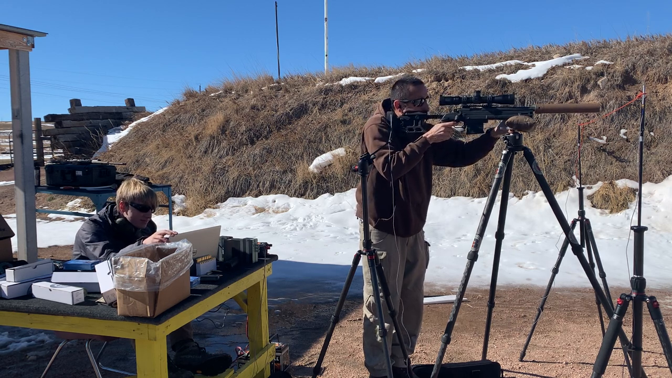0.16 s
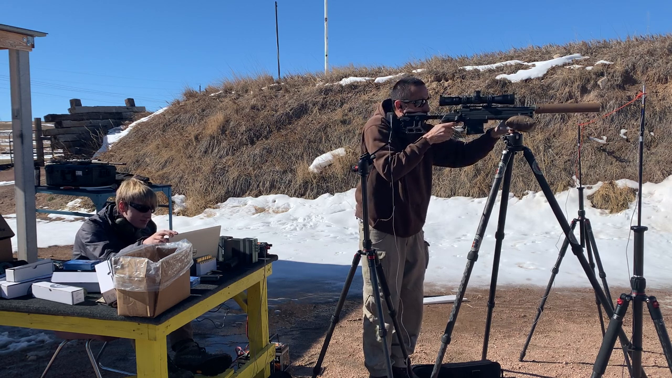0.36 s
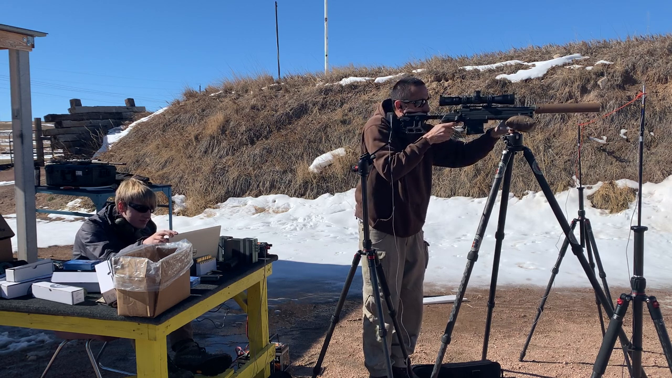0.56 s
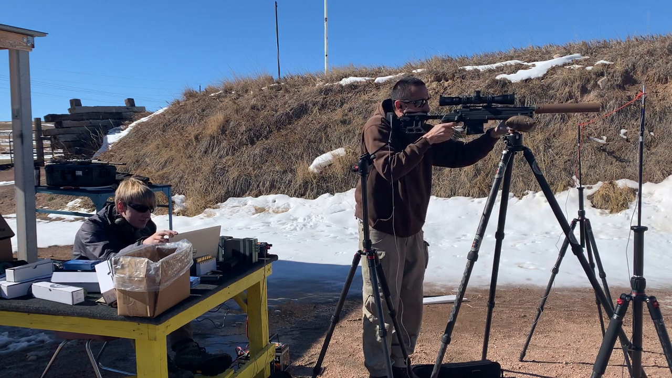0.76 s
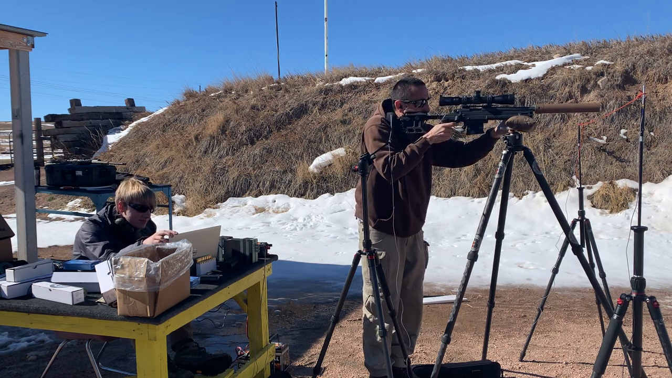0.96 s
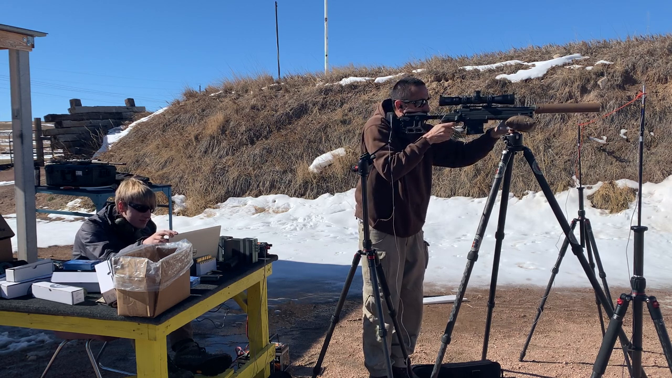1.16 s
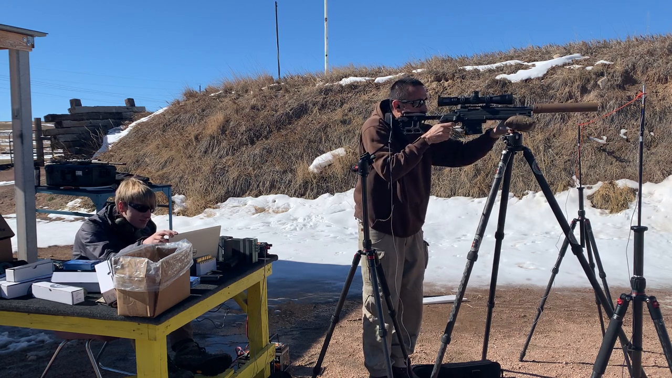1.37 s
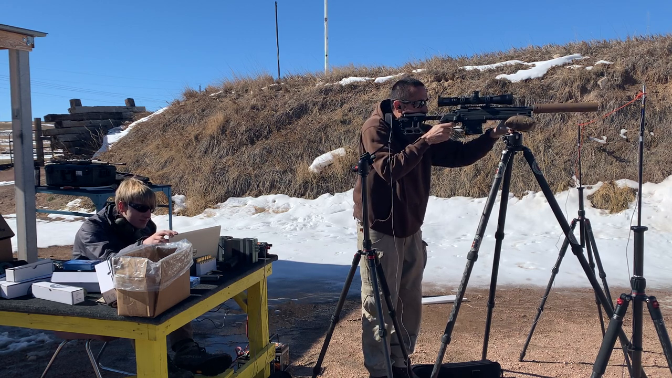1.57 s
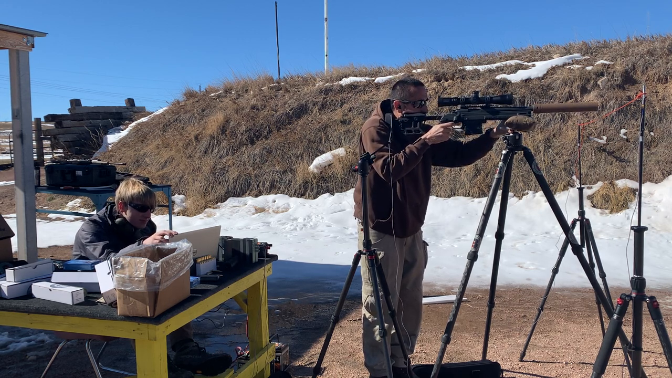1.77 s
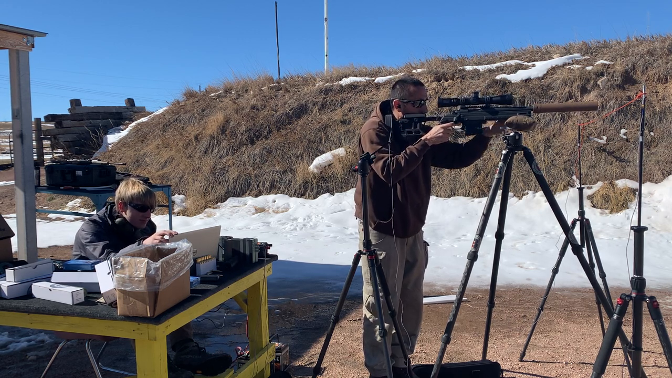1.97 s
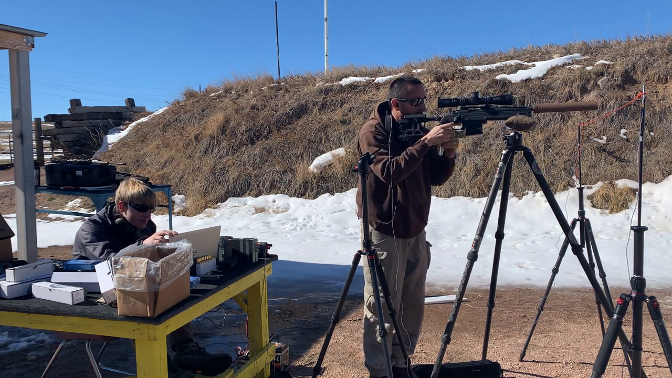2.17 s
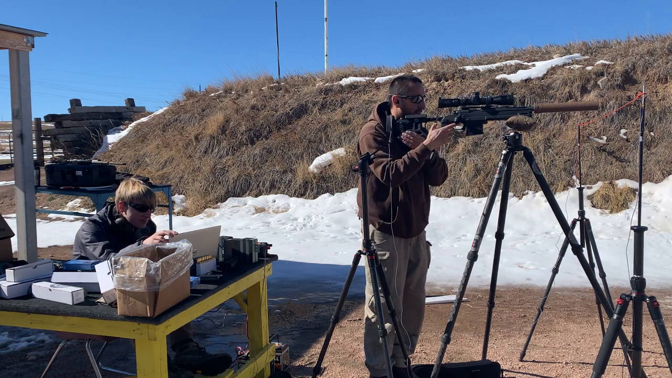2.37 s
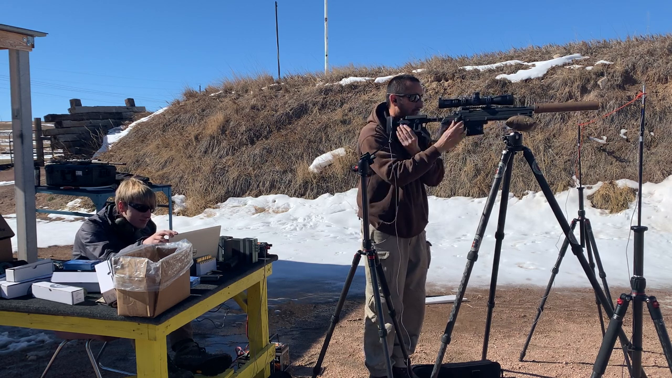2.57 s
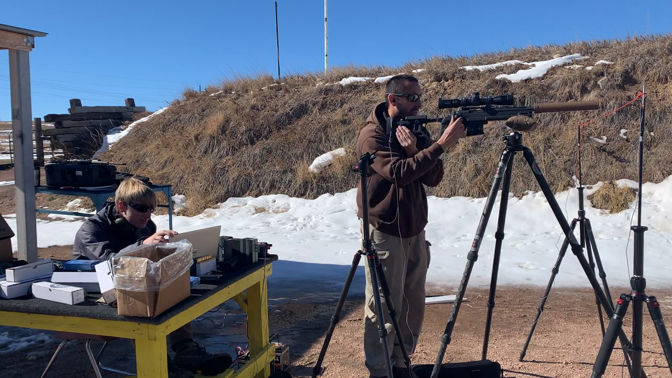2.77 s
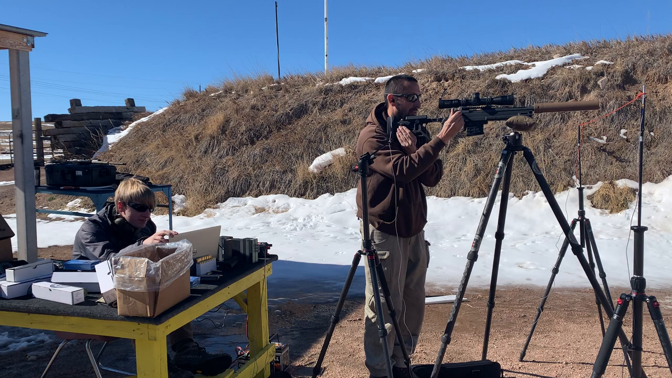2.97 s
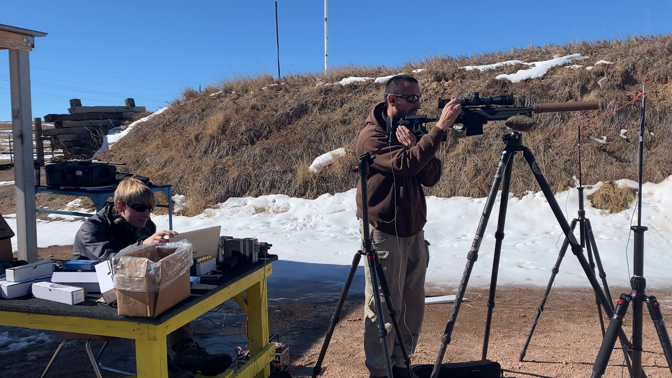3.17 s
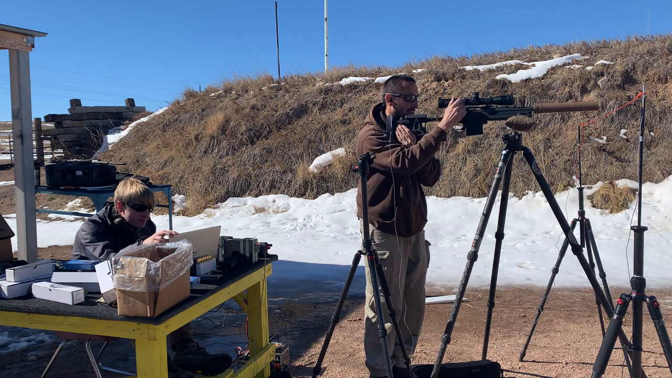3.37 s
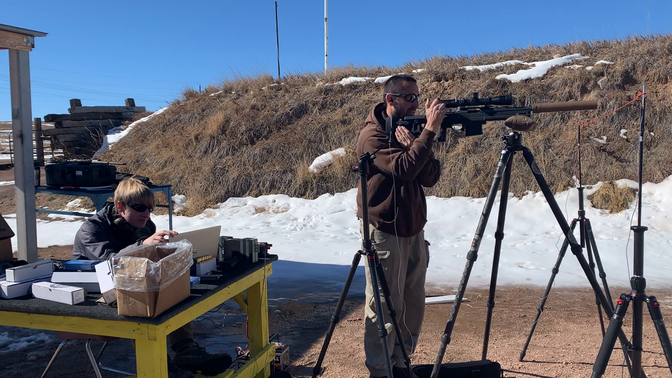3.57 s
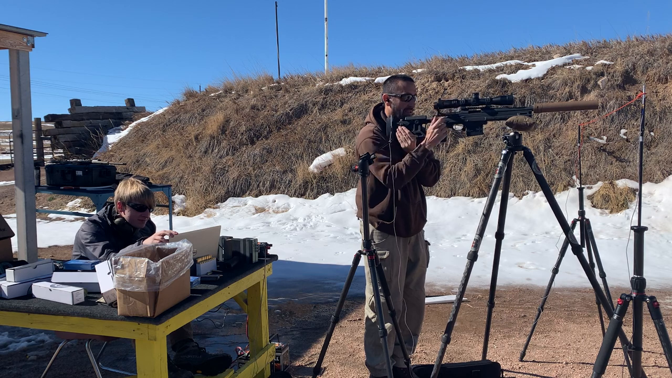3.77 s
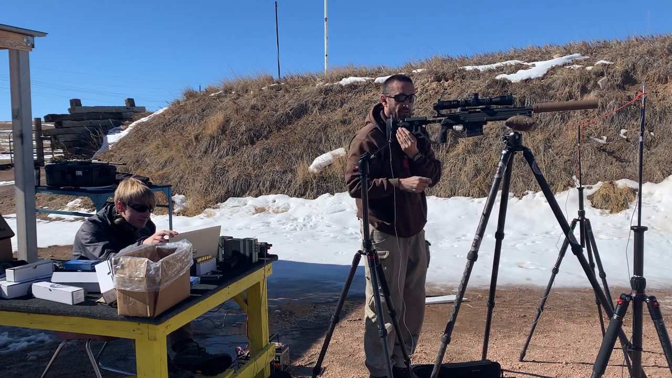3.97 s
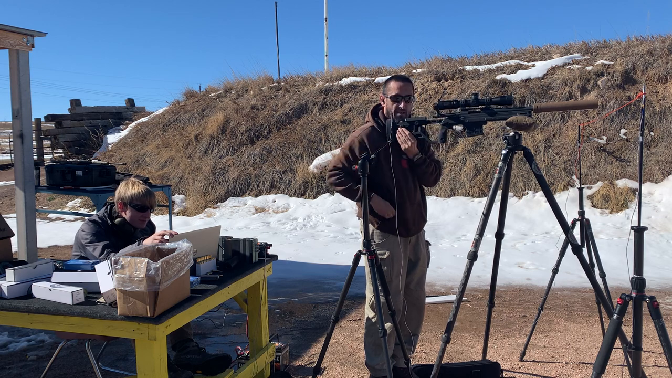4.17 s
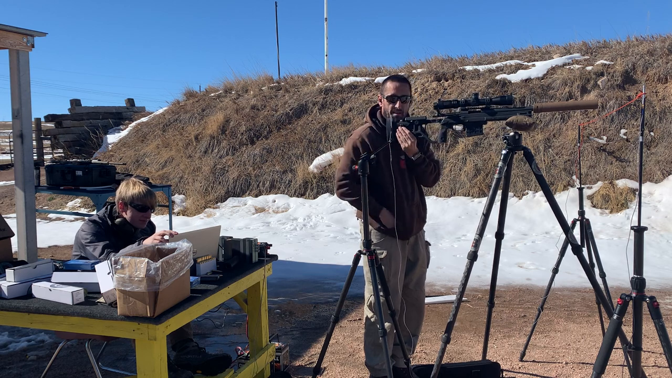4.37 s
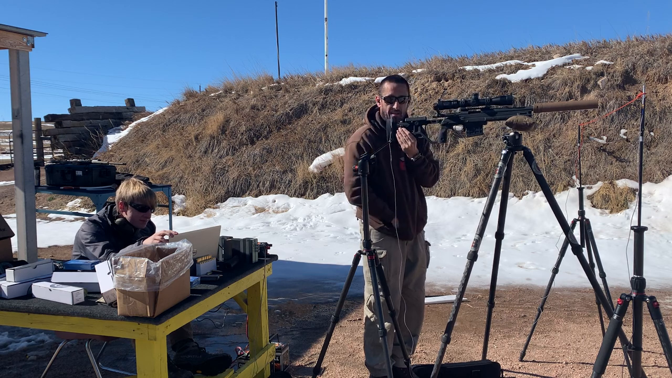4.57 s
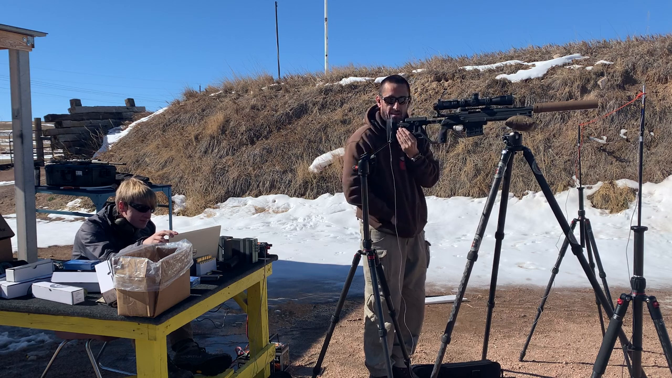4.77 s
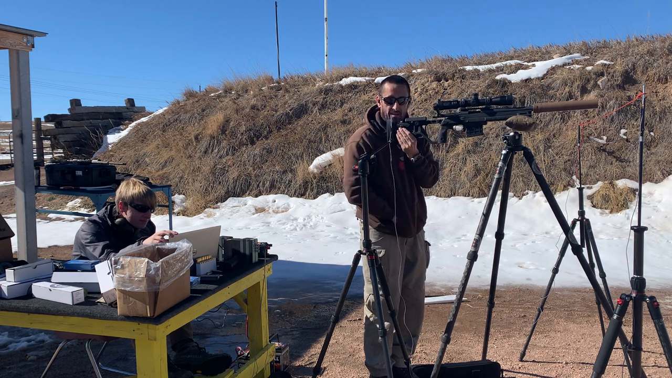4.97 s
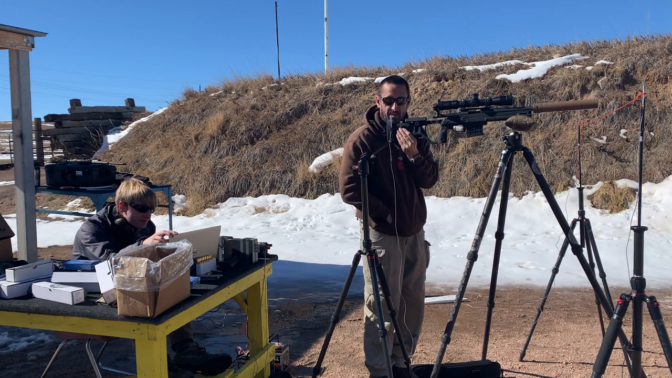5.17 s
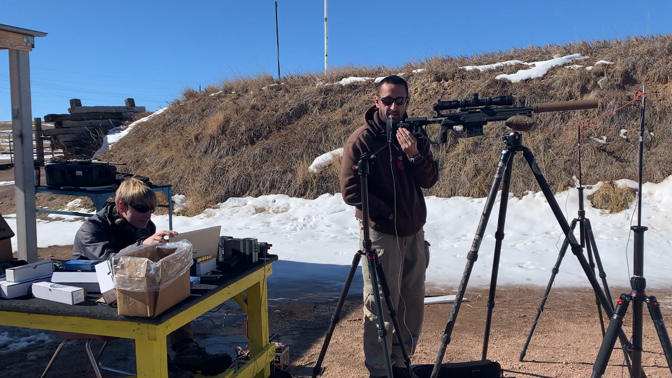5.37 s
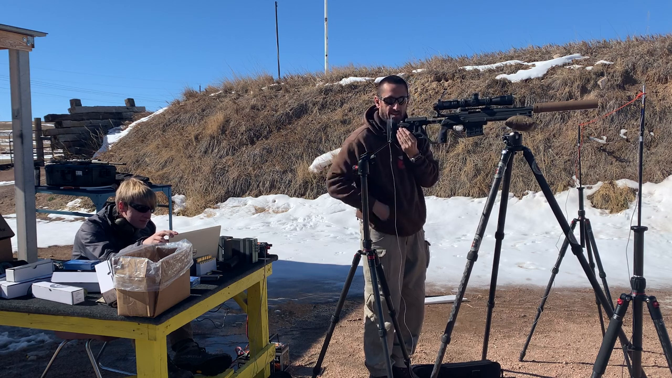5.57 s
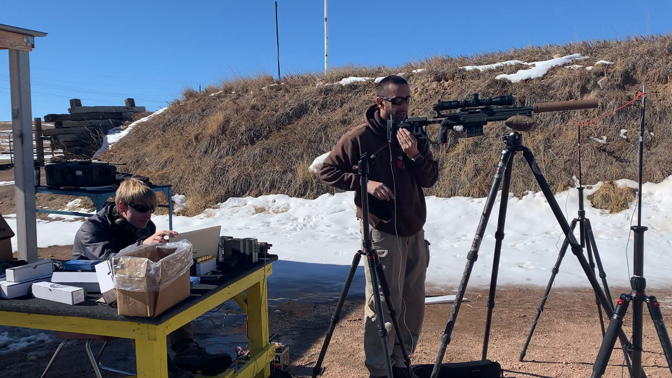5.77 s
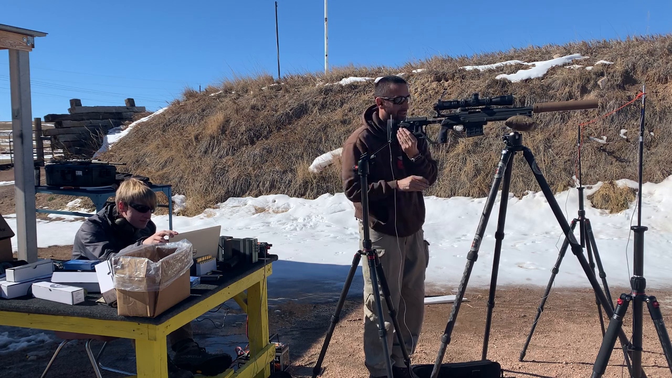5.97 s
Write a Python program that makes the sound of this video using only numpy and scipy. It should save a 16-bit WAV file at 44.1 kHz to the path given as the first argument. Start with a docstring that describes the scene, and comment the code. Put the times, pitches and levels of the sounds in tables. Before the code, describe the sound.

Light wind rumbles softly on the microphone at an outdoor range. A suppressed rifle fires once, a sharp crack with a burst of gas that slightly overloads the microphone and echoes quickly off earth banks. After a pause the bolt is worked: a cluster of steel clicks and knocks with a brief ring of the brass case, then a few more clicks. A very faint distant engine hums underneath.

```python
"""Light wind buffets the microphone at an outdoor range, then a suppressed rifle on a tripod fires once.
The burst of gas overloads the microphone, scatters off the benches and echoes back from earth banks.
The shooter lifts and draws the bolt: steel knocks on steel, a sleeve rubs, and the empty brass case
rings as it is taken out. Meanwhile a far engine swells with a roar, a brief whine and a hum."""
import sys
import numpy as np
from scipy import signal
from scipy.fft import rfft, irfft, next_fast_len
from scipy.io import wavfile
from scipy.ndimage import uniform_filter1d

SR = 44100
rng = np.random.default_rng(int(sys.argv[2]) if len(sys.argv) > 2 else 0)


def wav_out(sig):
    """Save sig, one row per channel (or a flat mono array), as 16-bit PCM at SR to the path in sys.argv[1]."""
    wavfile.write(sys.argv[1], SR, np.round(np.clip(np.atleast_2d(sig).T, -1, 1) * 32767).astype(np.int16))


N = 265129
TIME = np.arange(N) / SR
SHOT_S = 1.3297


def amp(db):
    """Turns decibels into a gain."""
    return 10 ** (np.asarray(db) / 20)


def unit(x):
    """Scales a signal to an average (rms) strength of 1."""
    return x / np.sqrt(np.mean(x ** 2) + 1e-20)


def read(points, hz):
    """Looks up values between a table's rows, on a log-frequency scale."""
    f, value = np.transpose(points)
    return np.interp(np.log(hz + 1), np.log(f + 1), value)


def add(mix, s, sound):
    """Mixes a sound in, starting at second s."""
    part = mix[round(s * SR):][:len(sound)]
    part += sound[:len(part)]


def noise(colour, size=N):
    """Noise of strength 1; its colour says how strong each frequency is next to the others."""
    padded = next_fast_len(size)
    hz = np.fft.rfftfreq(padded, 1 / SR)
    spectrum = rfft(rng.standard_normal(padded)) * amp(read(colour, hz))
    return unit(irfft(spectrum, padded)[:size])


def band(centre_hz, octaves, size=2 * SR):
    """Noise that falls away beyond so many octaves either side of a centre."""
    hz = np.geomspace(20, SR / 2, num=128)
    band_db = -10 * np.log10(1 + (np.log2(hz / centre_hz) / octaves) ** 6)
    return noise(np.c_[hz, band_db], size=size)


def drift(per_s):
    """Random wandering of strength 1, with per_s new targets a second."""
    targets = rng.standard_normal(4096)
    return unit(np.interp(TIME * per_s, np.arange(len(targets)), targets))


def swell(t, rise, t60):
    """Rises, then dies away; t60 is the time it takes to fade by 60 dB."""
    return (1 - np.exp(-t / rise)) * np.exp(-np.log(1000) * t / t60)


def arch(s, length):
    """A smooth rise and fall, starting at second s."""
    return np.sin(np.pi * np.clip((TIME - s) / length, 0, 1))


def fade_in(halfway_s, swell_s, db):
    """An S-shaped rise to a steady gain."""
    return amp(db) / (1 + np.exp((halfway_s - TIME) / swell_s))


def ring(t, hz, db, rise, t60):
    """One dying tone."""
    return amp(db) * swell(t, rise, t60) * np.sin(2 * np.pi * (hz * t + rng.random()))


def shortest_pulse(gain_db):
    """The shortest click that has the given level at each frequency."""
    log_gain = np.log(amp(np.r_[gain_db, gain_db[-2:0:-1]]))
    return np.fft.ifft(np.exp(np.conj(signal.hilbert(log_gain)))).real


def wind():
    """Swirls of air buffet the microphone over a smooth hush and a steady far rumble."""
    # gusts: peak t/s, level/dB, half length/s
    gusts = [(.3, -50, 0.67), (1.68, -53, .2), (3, -52.5, .15), (4.98, -54.5, 0.36), (5.9, -55, .12)]
    # colour of the buffeting: f/Hz, level/dB
    wind_colour = [(5, -3), (15, 2), (32, 0), (60, -9.5), (100, -20), (200, -34), (400, -51), (1000, -79.5)]
    # colour of the hush: f/Hz, level/dB
    hush_colour = [(120, -28.5), (200, -6), (328, -10.5), (440, -12.5), (709, -16), (821, -19),
                   (950, -18.5), (1020, -19), (16000, -45.5)]
    breeze_power = amp(-59) ** 2
    gust_power = sum(amp(db) ** 2 * np.exp(-((TIME - s) / half) ** 2) for s, db, half in gusts)
    swirls = noise(wind_colour) * amp(1.3 * drift(4.2))
    hush = amp(-78.5) * noise(hush_colour)
    rumble = amp(-72.5) * band(centre_hz=80, octaves=.6, size=N)
    return np.sqrt(breeze_power + gust_power) * swirls + hush + rumble


def gas():
    """Gas rushes out: it builds while the suppressor empties, drops as the flow ends, then dies away."""
    # colour of the rushing gas: f/Hz, level/dB
    gas_colour = [(60, -35.5), (250, -25), (420, -23.5), (700, -15), (1000, -11), (1400, -9.5),
                  (1800, -3.5), (2400, -10.5), (3400, -12), (4700, -6), (6000, -14.5), (7500, -12),
                  (10500, -17), (15500, -33.5)]
    attack_s, flow_s = 0.0009, .0128
    build_db_per_s, drop_db, fade_db_per_s = 400, 4, 790
    t = TIME[:SR // 4]
    flowing, after = np.minimum(t, flow_s), np.maximum(t - flow_s, 0)
    db = -17.5 + build_db_per_s * flowing - drop_db * (after > 0) - fade_db_per_s * after
    return noise(gas_colour, size=len(t)) * amp(db) * (1 - np.exp(-t / attack_s))


def scatter(colour):
    """Sound bounces back unevenly from the ground and banks; the highest notes die first."""
    # how long the scattered sound lasts: f/Hz, t60/s
    fade_times = [(200, 0.41), (900, .3), (2500, .36), (5000, .32), (8000, .27), (14000, .22)]
    hz, t, spectra = signal.stft(noise(colour, size=SR), SR, nperseg=256)
    patches = unit(uniform_filter1d(rng.standard_normal(spectra.shape), size=12, axis=0))
    spectra = spectra * amp(2.5 * patches)  # louder and softer spots, a few ms long
    fade = np.exp(-np.log(1000) * t / read(fade_times, hz)[:, None])
    tail = signal.istft(spectra * fade, SR, nperseg=256)[1][:SR]
    return tail * (1 - np.exp(-TIME[:SR] / .008))


def shot():
    """Pressure waves and brief tones ride on the rush of gas; the blast scatters around the range."""
    # pressure waves, direct and off nearby surfaces: t/s, level/dB, push length/s
    fronts = [(1.3298, -17.5, 0.00064), (1.334, -13.5, 0.00082), (1.3435, -17.5, .0008)]
    # brief narrow tones that colour the blast: f/Hz, relative level/dB, t60/s
    blast_tones = [(288, -37, 0.033), (545, -39, 0.32), (727, -31.5, 0.14), (1077, -31, 0.19),
                   (1305, -26, 0.12), (1424, -27.5, 0.063), (1794, -17, .11), (1826, -25, .13),
                   (2103, -19.5, 0.12), (2540, -30, .12), (4420, -20.5, 0.12), (4685, -21, .08),
                   (4910, -19, 0.1), (4920, -24.5, 0.1), (5150, -25.5, 0.1384), (6350, -29.5, 0.14),
                   (8200, -27, 0.068)]
    # colour of the scattered blast: f/Hz, level/dB
    tail_colour = [(80, -15), (250, -17), (550, -13.5), (900, -5.5), (1900, 0.5), (3200, -1.5), (5500, -6),
                   (9000, -11.5), (12000, -23.5), (16000, -38)]
    crack_colour = [(300, 0.5), (6000, 0), (12000, -4), (16000, -8.0)]  # f/Hz, level/dB
    out = np.zeros(N)
    add(out, SHOT_S, gas())
    for s, db, push_s in fronts:
        age = TIME[:2048] / push_s
        pressure = (1 - age) * np.exp(-age)  # a sudden push, then a longer suction
        crack = amp(2.5) * noise(crack_colour, size=len(age)) * np.exp(-age)  # the wave's ragged edge
        add(out, s, amp(db) * (pressure + crack))
    tones = sum(ring(TIME[:SR], hz, db, 0.001, t60) for hz, db, t60 in blast_tones)
    add(out, SHOT_S, amp(-1.5) * tones)
    add(out, SHOT_S, amp(-28.5) * scatter(tail_colour))
    return out


def echoes():
    """The shot returns: smeared off earth banks, as a slap from downrange, as a roll off far hills."""
    # echoes from the banks: t/s, level/dB, smear/s, t60/s
    bank_echoes = [(1.389, -39.5, 0.0042, 0.095), (1.495, -48, 0.0059, 0.096), (1.512, -50, 0.0027, 0.047),
                   (1.573, -65, .008, .12)]
    # their colour before the air dulls it: f/Hz, level/dB
    echo_colour = [(100, -20.5), (500, -11), (1000, -9.5), (2100, -2), (3500, -2), (5500, 1), (9000, -1.5),
                   (14000, -17)]
    # parts of the one sharp slap: level/dB, centre f/Hz, half width/octaves, rise/s, t60/s
    slap_parts = [(-27.5, 4900, 0.095, 0.00018, 0.0058), (-38.5, 1450, 1.1, .0005, 0.049),
                  (-38, 200, 1.35, .003, 0.047)]
    slap_s, air_loss_db_per_khz_s = 1.4642, 20
    out, t = np.zeros(N), TIME[:2 * SR]
    hz, colour_db = np.transpose(echo_colour)
    for s, db, smear, t60 in bank_echoes:
        dulled_db = colour_db - air_loss_db_per_khz_s * (s - SHOT_S) * hz / 1000  # farther is duller
        add(out, s, amp(db) * noise(np.c_[hz, dulled_db], size=len(t)) * swell(t, smear, t60))
    for db, centre_hz, octaves, rise, t60 in slap_parts:
        add(out, slap_s, amp(db) * band(centre_hz, octaves) * swell(t, rise, t60))
    roll = amp(-72) * band(centre_hz=1300, octaves=1) * swell(t, rise=.1, t60=1.6)
    add(out, SHOT_S, roll)
    return out


def aftertone():
    """A faint wavering tone comes and goes after the shot."""
    strength = amp(-84.5 + 3.5 * drift(14)) * arch(s=1.47, length=.9)
    pitch_hz = 1050 * (1 + 0.0071 * drift(30))
    return strength * np.sin(2 * np.pi * np.cumsum(pitch_hz) / SR)


def bolt():
    """Each knock is a tick and a short chatter of steel that rings the receiver, the rifle's body."""
    # knocks of bolt, magazine and case: t/s, relative level/dB,
    # lows/dB, mids/dB and highs/dB (next to 1800 Hz), t60/s, receiver ring/dB
    knocks = [(1.642, -73.5, -8, 7, 7, .03, -34), (2.009, -79, -2, 0, -2, .024, -32),
              (2.4585, -73, -5, 1, -8, .03, -32), (2.537, -73, -3, -2, -3, .03, -32),
              (2.637, -75, -6, 2, 4, .02, -32), (2.808, -61, -4, -2, -19, .036, -31),
              (2.8692, -49.5, -19, -19, -30, .04, -20), (3.086, -66.5, 7.5, 0.5, -13, 0.069, -31),
              (3.2375, -59, 12, -9, -18, 0.052, -31), (3.2499, -44, 0, -2.5, -17, 0.023, -31),
              (3.2567, -40.5, 1, -1.5, -1, 0.028, -32), (3.4821, -41.5, -13, 0, 2, .019, -31),
              (3.486, -43.5, -8, -3, -6, 0.033, -31), (3.5038, -50, 1, -3, -17, 0.06, -31),
              (3.5102, -51, -5, -16, -22, 0.061, -29), (3.522, -51.5, -6, -15, -20, 0.077, -29),
              (3.5356, -36, -6, -2, -8.5, 0.032, -25), (3.5393, -40.5, 2.5, 7, -9, 0.032, -17.5),
              (3.5648, -44, -13, -1, 0, 0.023, -38), (3.5798, -36, -12, -3, -6, 0.016, -35),
              (3.606, -26.5, 3.5, 0.5, -1.5, 0.027, -36), (3.612, -32.5, -5, 2.5, -1, 0.018, -29),
              (3.7258, -54, 0, -1.5, -25.5, .02, -14.5), (3.7586, -57, -4, -3.5, -21, 0.029, -22),
              (4.2635, -38.5, -4, -9, -14, 0.0058, -39), (4.2658, -43, 0, -3, -3, 0.01, -45),
              (4.2735, -57, -6, 3, 4, .014, -35), (4.382, -37.5, -14, 4.5, -7.5, 0.021, -42),
              (4.3963, -30.5, -15, -9.5, -9, 0.011, -45), (4.401, -46, -7, -21, -5, 0.033, -40),
              (4.434, -52, -9, -5, -7, 0.018, -40), (4.512, -68, -16, 1, 0, .025, -36),
              (4.7417, -69.5, -10, 6, 9.5, 0.029, -36), (4.9196, -69.5, -8, 6, 11.5, .018, -36),
              (4.9965, -76, -4, 6, 0, .025, -36)]
    # colour that all knocks share: f/Hz, level/dB
    knock_colour = [(100, -27.5), (280, -17.5), (450, -12.5), (640, -2.5), (800, -0.5), (1050, 0),
                    (1800, 4.5), (2400, -1), (4700, -3), (7000, -4), (10500, -12.5), (13000, -30),
                    (16000, -32)]
    # tones of the receiver: f/Hz, relative level/dB, t60/s
    receiver_tones = [(820, -8.5, 0.074), (1033, 1.5, 0.21), (1130, -0.5, 0.13), (1430, -18, .1),
                      (1870, -9.5, 0.23), (2120, -20.5, 0.099), (2430, -14, .1), (2800, -16, 0.16),
                      (3330, -19, 0.12), (3960, -31, .14), (4300, -20, .06), (6550, -21, .08)]
    # tones of the stop that the bolt slams into: f/Hz, level/dB, t60/s
    stop_tones = [(460, -44.5, .025), (660, -43, 0.022), (823, -26.5, 0.023), (1065, -23.5, 0.029),
                  (1520, -26, .022), (1823, -31, 0.042)]
    stop_s, ground_delay_s = 3.606, .0042
    out, t, hz = np.zeros(N), TIME[:16384], np.fft.rfftfreq(1024, 1 / SR)
    for s, db, low_db, mid_db, high_db, t60, ring_db in knocks:
        chatter = rng.standard_normal(len(t)) * swell(t, 0.00027, t60)
        chatter[0] += 2.5  # first contact
        ringing = sum(ring(t, f, tone_db, .0007, fade) for f, tone_db, fade in receiver_tones)
        hardness = np.c_[[300, 900, 1800, 3500, 7000], [min(low_db, -5), low_db, 0, mid_db, high_db]]
        click = shortest_pulse(read(knock_colour, hz) + read(hardness, hz))
        knock = signal.fftconvolve(chatter + amp(ring_db) * ringing, click)
        add(out, s, amp(db + 6.5) * knock)
        add(out, s + ground_delay_s, amp(db - 8.5) * knock)  # the sound bounces off the ground
    add(out, stop_s, sum(ring(t, f, tone_db, 0.0012, fade) for f, tone_db, fade in stop_tones))
    tail = scatter([(200, 14), (1000, -3), (3000, 1.5), (6000, -5), (14000, -9)])  # f/Hz, level/dB
    scattered = signal.fftconvolve(out, tail / np.linalg.norm(tail))[:N]
    return out + amp(-24) * scattered


def rubs():
    """Sleeve and hand slide on the rifle's stock with a grainy friction."""
    # hand movements: t/s, level/dB, length/s
    movements = [(1.965, -77.5, .11), (2.419, -83.5, 0.29), (2.75, -86, 0.15), (3.26, -78, 0.064),
                 (3.497, -66, 0.21), (3.888, -76, 0.076), (4.483, -79.5, 0.15)]
    # colour of the rubbing: f/Hz, level/dB
    rub_colour = [(300, 12), (1600, 12.5), (5000, 3.5), (9000, -1), (14000, -30)]
    strokes = sum(amp(db) * arch(s, length) for s, db, length in movements)
    friction = unit(noise(rub_colour) * amp(2.6 * drift(250)))
    return strokes * friction


def engine():
    """A far engine: a hollow roar swells, a whine winds up once and fades, and a wavering hum grows."""
    # colour of the roar: f/Hz, level/dB
    roar_colour = [(120, -13.5), (260, -8), (410, 5.5), (650, -5.5), (1150, -12), (1550, -8), (1700, -15),
                   (1900, -8.5), (2250, -19), (3000, -11), (3700, -25), (5200, -24.5), (8000, -36),
                   (14000, -44)]
    # tones of the hum: f/Hz, relative level/dB
    hum_tones = [(317.6, -86.5), (387.6, -81.5), (484.5, -79), (635.2, -87.5), (775.2, -84.5), (1572, -89),
                 (1884, -98), (3138, -100)]
    whine_s, wind_up_s, from_hz, to_hz = 2.47, .46, 1700, 2450
    roar = unit(noise(roar_colour) * amp(0.85 * drift(16)))
    roar *= fade_in(halfway_s=2.6, swell_s=0.36, db=-73)
    speed = 1 + 0.0033 * drift(6)  # hum and whine waver together
    engine_time = np.cumsum(speed) / SR
    hum = np.sqrt(2) * sum(amp(db) * np.sin(2 * np.pi * hz * engine_time) for hz, db in hum_tones)
    hum *= fade_in(halfway_s=4.75, swell_s=0.41, db=1.5)
    t = np.maximum(TIME - whine_s, 0)
    whine_hz = to_hz + (from_hz - to_hz) * np.exp(-t / wind_up_s)
    whine = np.sin(2 * np.pi * np.cumsum(whine_hz * speed) / SR)
    whine *= amp(-74.5) * swell(t, rise=.35, t60=2.5)
    return roar + hum + whine


def metal_pings():
    """Small metal pings sound under some of the knocks."""
    # pings: t/s, f/Hz, level/dB
    pings = [(3.257, 4690, -51.5), (3.538, 2570, -38.5), (4.921, 5200, -67), (4.997, 5260, -68)]
    out = np.zeros(N)
    for s, hz, db in pings:
        add(out, s, ring(TIME[:SR], hz, db, rise=0.00038, t60=0.055))
    return out


def brass_case():
    """The empty case keeps singing after each touch."""
    # tones of the case: f/Hz, relative level/dB, t60/s
    case_tones = [(4156, -36, 1.2), (5170, -30.5, .55), (8050, 0, 0.12)]
    # touches that set it ringing: t/s, level/dB, rise/s
    touches = [(3.572, -46, .0037), (3.579, -46.5, .0007), (4.28, -64, .01)]
    out = np.zeros(N)
    for s, db, rise in touches:
        ringing = sum(ring(TIME[:2 * SR], hz, tone_db, rise, t60) for hz, tone_db, t60 in case_tones)
        add(out, s, amp(db) * ringing)
    return out


def scene():
    """All the sounds meet at one microphone."""
    mix = wind() + shot() + echoes() + aftertone()
    mix += bolt() + rubs() + engine() + metal_pings() + brass_case()
    return mix[None]


def record(dry):
    """The microphone overloads softly on the blast, and the very highest treble is cut off."""
    ceiling, cutoff_hz = .4, 16100
    squashed = dry / (1 + (dry / ceiling) ** 4) ** (1 / 4)
    treble_cut = signal.firwin(255, cutoff_hz, window=("kaiser", 9), fs=SR)
    return signal.oaconvolve(squashed, treble_cut[None], "same")


dry = scene()
out = record(dry)
wav_out(out)
```